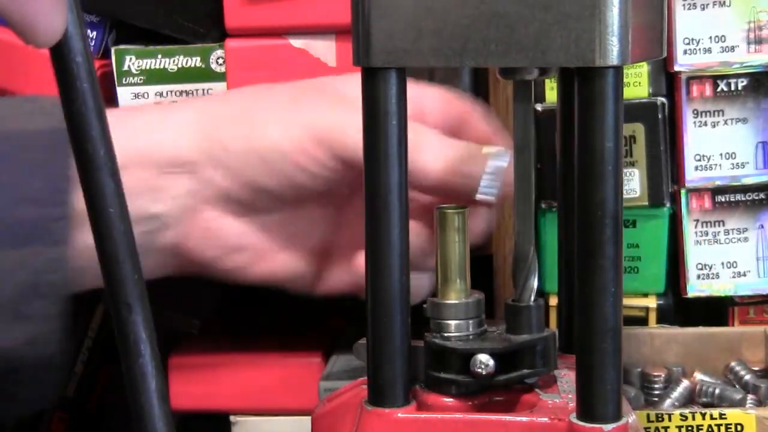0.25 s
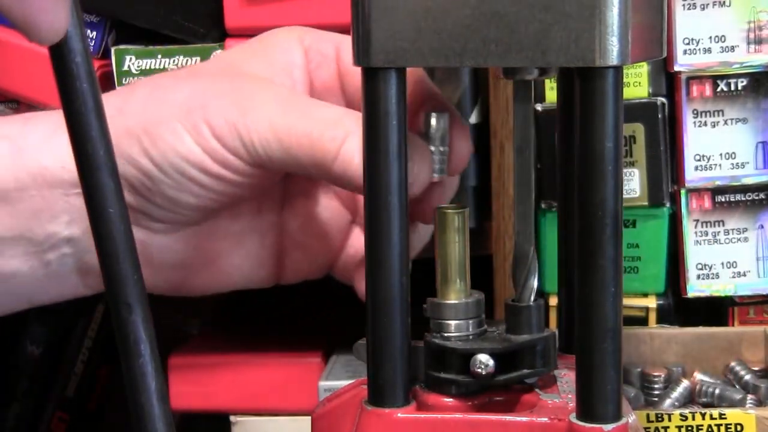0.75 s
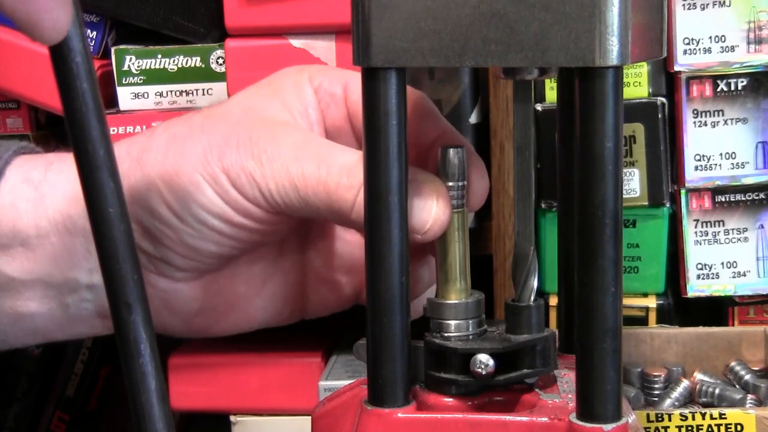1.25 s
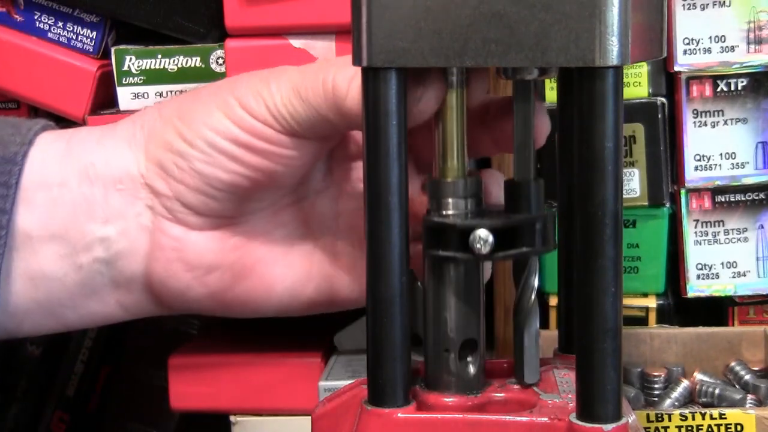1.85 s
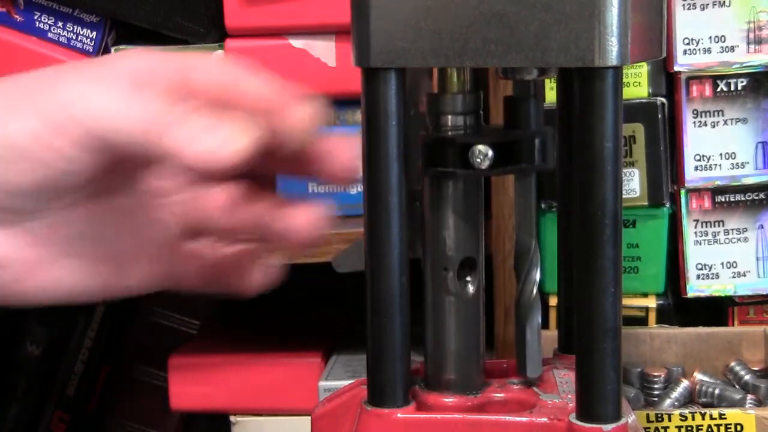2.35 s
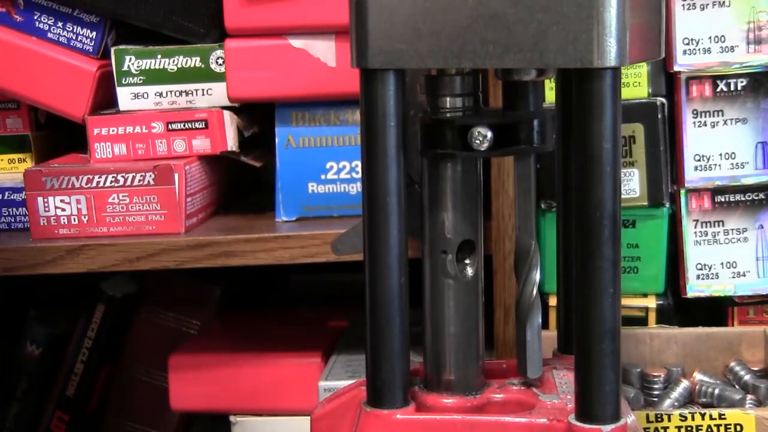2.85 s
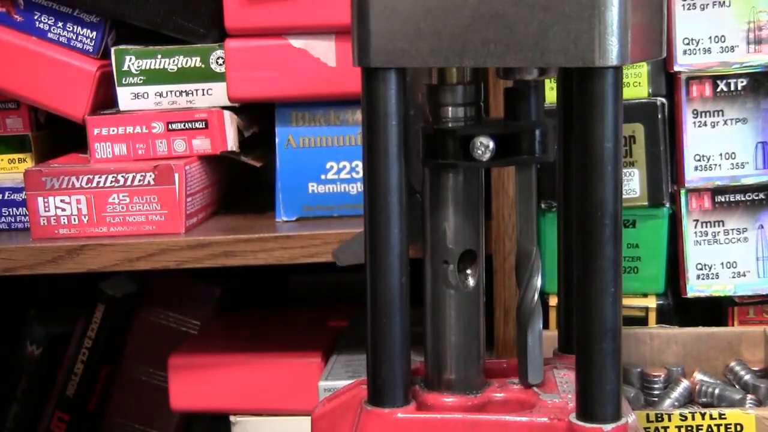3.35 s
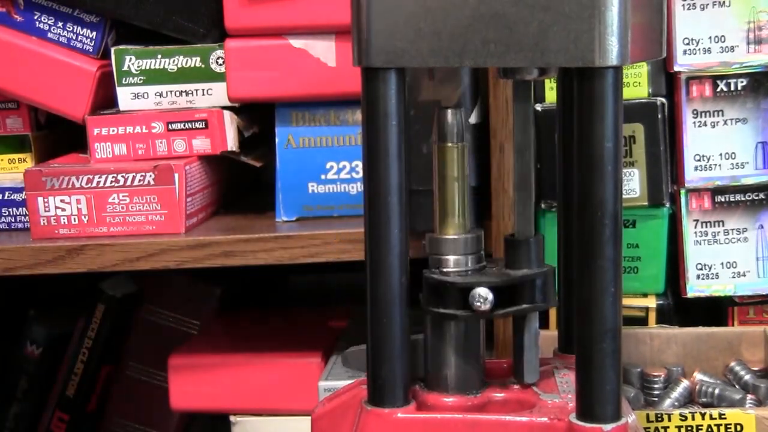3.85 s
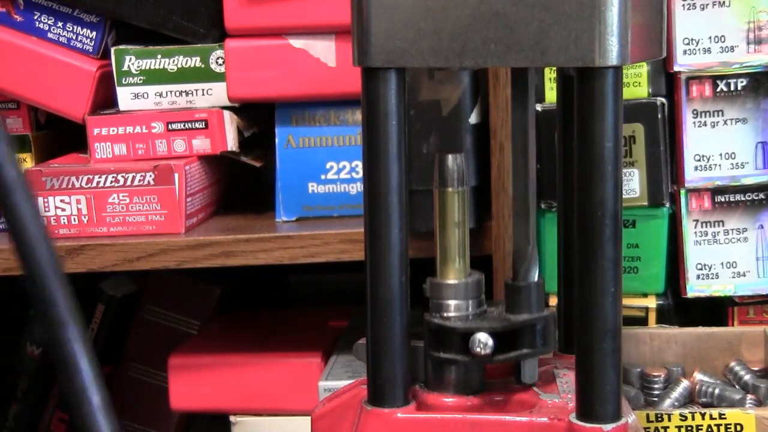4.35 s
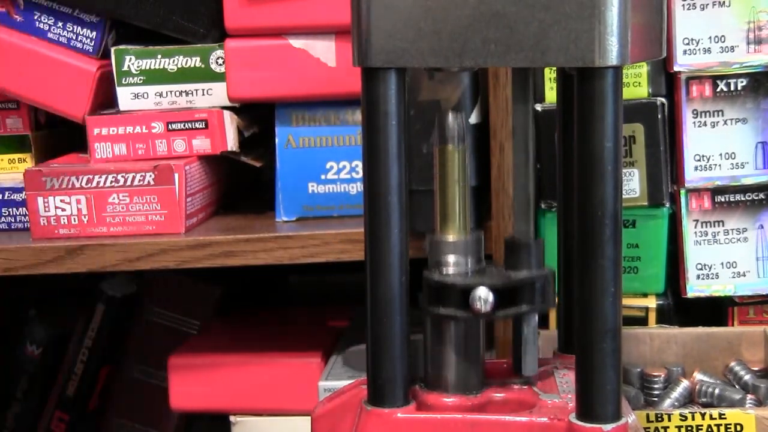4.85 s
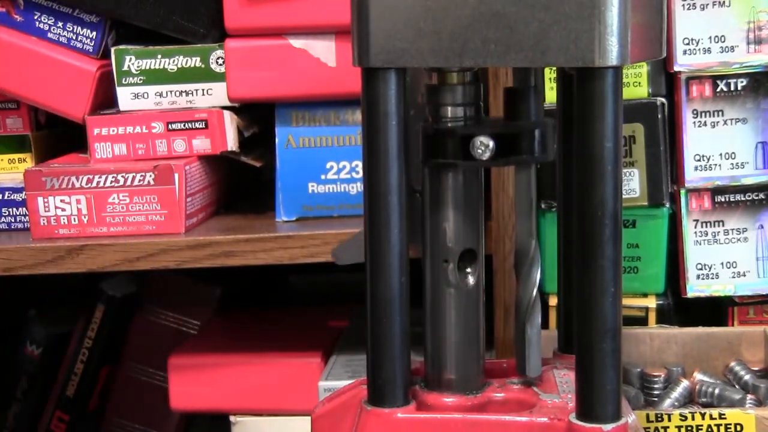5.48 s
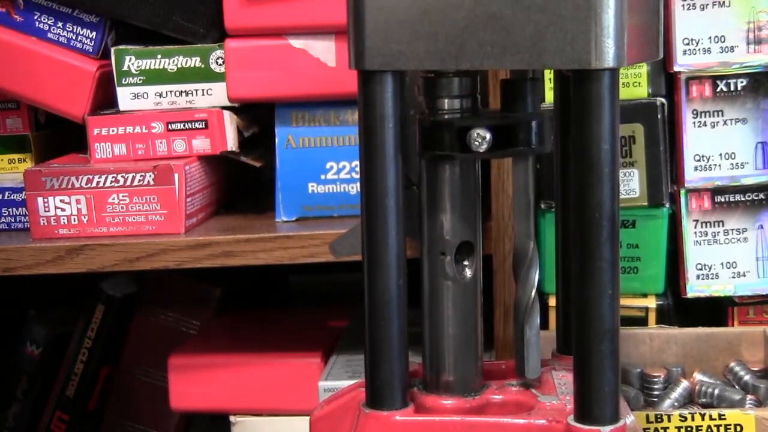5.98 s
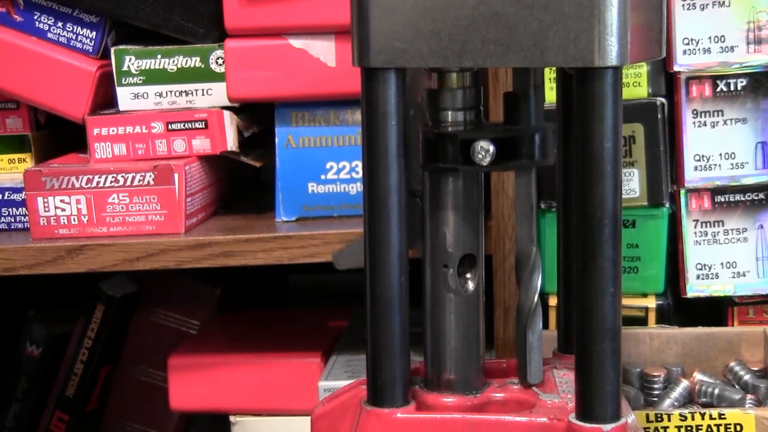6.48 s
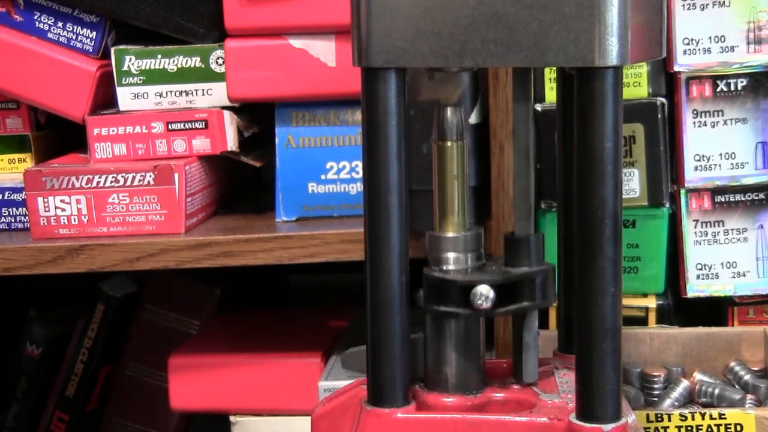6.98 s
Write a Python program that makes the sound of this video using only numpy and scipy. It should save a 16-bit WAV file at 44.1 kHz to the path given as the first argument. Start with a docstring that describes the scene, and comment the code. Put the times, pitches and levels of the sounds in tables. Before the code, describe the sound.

A hand-worked metal press on a wooden bench: quiet rubbing, then bursts of sharp clicks, clacks and short rattles over low thumps and faint hiss.

```python
"""A hand-worked turret press on a wooden bench in a small, furnished room.
From the start, bench rumble, hiss and the sliding ram's groan lie below; a hollow rub fades out by 0.7 s.
A lone knock at 0.9 s leads to a busy run from 1.6 s: noise-struck resonances, thin parts ringing on as beating
sine pairs, a loose part bouncing, then the ram's drag and damped low swings as the bench jolts the stand.
Sparser knocks follow, then hard clusters near 5 s, with more bounces, and near 6.8 s. Delays give the room."""
import sys
import numpy as np
from scipy import signal
from scipy.fft import rfft, irfft, next_fast_len
from scipy.io import wavfile
from scipy.ndimage import uniform_filter1d

SR = 44100
rng = np.random.default_rng(int(sys.argv[2]) if len(sys.argv) > 2 else 0)


def master_out(mix):
    """Clip the mix to full scale and print it as 16-bit PCM to the path in sys.argv[1]."""
    frames = np.transpose(np.atleast_2d(mix))
    ceiling = np.clip(frames, -1, 1)
    pcm = np.round(ceiling * 32767).astype(np.int16)
    wavfile.write(sys.argv[1], SR, pcm)


N = 318621

# Lever and ram in motion, before the bed trims: start_s, rumble_db, drag_db
MOTION = [(0, -63, -66), (.74, -58.5, -64.5), (1.3, -57.5, -70.5), (1.6, -55, -67), (1.83, -56, -62),
          (1.95, -49, -51), (2.09, -52, -47), (2.2, -46, -53.5), (2.28, -54, -49.5), (2.35, -59, -54),
          (2.41, -55, -63.5), (2.67, -58, -64.5), (2.88, -46.5, -58), (3.06, -60, -69), (3.5, -52, -66),
          (3.68, -59, -60), (3.86, -65, -63.5), (4.0, -51, -53.5), (4.1, -59, -65.5), (4.5, -55, -62.5),
          (4.93, -64, -68), (5.13, -65, -62), (5.23, -52, -65), (5.4, -50, -52), (5.52, -52, -64),
          (6.39, -62, -67), (7.06, -55, -63), (7.22, -52, -63)]
# Noise colours, relative before scaling to rms 1: pitch_hz, level_db_per_hz
RUMBLE_COLOUR = [(11, -44), (18, 14), (32, -0.5), (65, 9.5), (125, -10.5), (177, -33), (200, -20.5),
                 (260, -67), (440, -120)]
GROAN_COLOUR = [(65, -35), (110, 2.5), (269, -2.5), (345, -3.5), (384, -6.5), (433, -6), (600, -14.5),
                (780, -51), (1320, -120)]
SLIDE_COLOUR = [(450, -3), (650, -4), (800, -2), (1400, -5.5), (2000, -9), (3100, -15), (5000, -16.5),
                (9000, -19.5), (15000, -52)]
HISS_COLOUR = [(59, -38), (100, -2.5), (140, -46), (342, -21.5), (414, -22.5), (512, -16.5), (674, -19.5),
               (2030, -21), (2680, -20), (15900, -23.5)]
# How alike left and right hiss are: pitch_hz, likeness (0 to 1)
HISS_LIKENESS = [(60, 0.82), (130, 0.22), (290, 0.073), (640, 0.039), (1400, 0.022), (3000, 0.014)]
# The bench jolts the stand: start_s, swing_db (before damping), swing_hz
JOLTS = [(1.967, -40, 108), (2.169, -53, 37.7), (2.227, -23, 45), (2.287, -29.5, 79.5), (2.334, -31.5, 80),
         (2.812, -33.5, 102), (2.826, -29, 58), (2.888, -31, 37.8), (2.964, -34.5, 37), (3.27, -46, 70.0),
         (3.892, -40.5, 35.0), (3.941, -41, 26.9), (4.006, -36, 60.5), (5.172, -36, 69), (5.285, -35, 80),
         (5.313, -28.5, 56.5), (5.72, -46, 71.6), (6.014, -37, 70.4), (6.039, -32, 52), (6.456, -39, 72),
         (6.839, -32.5, 55), (7.13, -35, 72)]
# Loudness curve of a hollow rub close by: start_s, level_db
RUB_LEVEL = [(0.0, -53), (0.134, -55.5), (0.224, -57), (0.236, -60), (0.546, -60.5), (0.612, -62.5),
             (0.688, -89), (0.7, -75)]
# Resonances of the rubbed cavity, relative levels: pitch_hz, width_hz, level_db
HOLLOW_MODES = [(734, 43, 3), (710, 37, -9), (1460, 46, -33), (2110, 90, -10), (3100, 130, -20)]
# Metal contacts, part levels before trims: start_s, turret_db, frame_low_db, frame_high_db, edge_db,
# rattle_db (against the chatter), favoured_low_hz, favoured_middle_hz, favoured_high_hz
CONTACTS = [(0.9292, -24, -56, -48, -42.5, -19.5, 342, 1420, 4600),
            (1.1262, -55, -71, -59, -71, -13, 760, 1220, 7490),
            (1.5992, -43, -69, -57, -65, -9.5, 203, 1240, 11200),
            (1.6063, -37, -57, -54.5, -53, -16, 423, 1980, 11300),
            (1.6348, -35, -50.5, -44, -61, -18.5, 433, 1720, 5940),
            (1.6953, -49, -58, -56, -66, -14, 202, 869, 6640),
            (1.708, -39, -55, -47, -63, -14, 727, 1460, 5900),
            (1.727, -36, -48.5, -43, -56, -12.5, 750, 1100, 11200),
            (1.7616, -19, -44.5, -35, -56, -17.5, 240, 1470, 7340),
            (1.8837, -42, -60, -57, -68, -15, 361, 1670, 4530),
            (1.9065, -45.5, -56, -52, -64, -7, 248, 1680, 4600),
            (2.2353, -33.5, -49, -46, -50, -15, 202, 1150, 11300),
            (2.2424, -58, -40, -46.5, -64, -13.5, 275, 921, 2840),
            (2.2746, -68, -39, -41.5, -65, -15.5, 220, 1290, 2910),
            (2.364, -51, -45.5, -50.5, -71, -24, 220, 856, 4030),
            (2.4794, -61, -62, -56, -70, -19, 420, 939, 7260),
            (2.8005, -36.5, -45, -47, -57, -15, 250, 940, 4370),
            (2.8277, -67, -68, -62, -73, -23, 285, 886, 8860),
            (2.9139, -46.5, -69, -61.5, -68, -12, 234, 915, 3070),
            (3.1776, -48, -75, -59, -70, -15, 202, 1150, 2750),
            (3.2657, -44.5, -50, -42.5, -72, -15.5, 414, 1200, 2740),
            (3.291, -53, -67, -47.5, -72, -14, 237, 1450, 2830),
            (3.3347, -58, -50, -59, -70, -13.5, 333, 1100, 3840),
            (3.3576, -59, -56, -60, -71, -12, 240, 1160, 3930),
            (3.4233, -52, -59, -50.5, -69, -12.5, 407, 1840, 2930),
            (3.5882, -50, -70, -66, -60, -16, 296, 918, 6330),
            (3.668, -51, -62, -53.5, -72, -10, 358, 2330, 6510),
            (3.8058, -48.5, -66, -54, -69, -13, 275, 2200, 5850),
            (3.8616, -29.5, -56, -43.5, -60, -13, 433, 1540, 6240),
            (3.9384, -33, -61, -56, -46.5, -16.5, 428, 2570, 11500),
            (3.9631, -47, -37, -36.5, -66, -20.5, 380, 1080, 2870),
            (3.9736, -33.5, -38.5, -39, -66, -20.5, 340, 1060, 2980),
            (4.2841, -59, -55.5, -59, -66, -10, 236, 1050, 2870),
            (4.3174, -60, -54, -63, -72, -15, 433, 1670, 7080),
            (4.5397, -53, -51.5, -50.5, -72, -15, 334, 920, 6260),
            (4.5955, -39.5, -48, -42.5, -50.5, -13, 242, 830, 6500),
            (4.7365, -37, -63, -49.5, -48.5, -16, 441, 2220, 6950),
            (4.8534, -47, -73, -56, -58, -11, 258, 1930, 11100),
            (4.8663, -35.5, -57, -44.5, -50, -10.5, 340, 1530, 11300),
            (4.9321, -40, -61, -52, -67, -10.5, 455, 875, 10700),
            (4.9484, -36.5, -65, -51, -66, -11, 417, 1520, 6300),
            (5.0071, -15, -50, -31, -51, -19.5, 430, 1890, 7160),
            (5.0264, -44, -51, -52, -66, -14.5, 258, 2070, 6890),
            (5.0494, -38, -61, -54, -60, -12, 689, 937, 11300),
            (5.0588, -35.5, -63, -40, -54, -16, 345, 1150, 11400),
            (5.1496, -26, -50, -40, -52, -13, 420, 1430, 8810),
            (5.1584, -16.5, -48, -36, -51, -14, 455, 2050, 7300),
            (5.1664, -20.5, -35, -27, -52, -15.5, 440, 1270, 4550),
            (5.2854, -30, -42.5, -33, -55, -12, 242, 920, 2940),
            (5.3125, -46, -47, -40, -58, -19, 417, 1150, 4590),
            (5.3467, -18, -49, -31.5, -63, -20, 431, 1970, 7540),
            (5.5045, -47.5, -47, -50, -76, -18.5, 245, 900, 3400),
            (5.6264, -44.5, -67, -68, -77, -11.5, 420, 921, 3200),
            (5.7132, -63, -56, -48, -71, -17, 439, 1540, 2730),
            (5.7231, -68, -47.5, -45, -71, -14, 266, 1190, 3140),
            (5.7419, -64, -52, -48, -69, -24, 248, 1110, 2880),
            (6.0087, -43.5, -48.5, -46, -64, -15, 234, 896, 6530),
            (6.0643, -44.5, -39.5, -40, -60, -14.5, 507, 1150, 2800),
            (6.4372, -44, -51, -46, -68, -11, 253, 1590, 3060),
            (6.4587, -43, -49, -43.5, -74, -15.5, 431, 1150, 2770),
            (6.542, -53, -66, -48, -70, -18, 406, 1900, 6230),
            (6.7307, -40.5, -66, -52.5, -65, -18, 571, 1390, 7060),
            (6.7416, -41, -65, -52, -76, -14, 420, 2600, 2820),
            (6.7978, -35, -48, -39.5, -47, -13.5, 328, 2600, 9400),
            (6.8023, -18, -45, -34, -42, -15.5, 353, 1460, 4100),
            (6.8199, -28.5, -41, -37.5, -50, -16, 700, 945, 8930),
            (6.8396, -35, -54, -52, -58, -9, 229, 947, 11100),
            (6.9416, -41, -68, -56, -59, -17, 253, 2140, 5940),
            (7.007, -31, -61, -46.5, -53, -11, 229, 1660, 6340),
            (7.08, -40, -69, -63, -59, -13, 202, 1560, 11000),
            (7.0854, -37, -64, -57, -53, -9, 331, 1600, 11200),
            (7.1099, -27.5, -34, -35.5, -49, -19, 385, 1180, 9200),
            (7.1226, -46, -37.5, -36.5, -66, -18, 368, 1190, 2880),
            (7.1705, -45.5, -49, -46, -69, -16.5, 423, 960, 3050)]
# Damped resonances of the heavy parts, relative levels: pitch_hz, level_db, t60_s
TURRET_MODES = [(5720, -5, 0.0006), (5923, -3.5, 0.0033), (6218, -1, 0.0041), (6503, -3.5, 0.0032),
                (6573, -12.5, 0.012), (7560, -11, 0.0031), (7565, -7.5, 0.0032), (7460, -3.5, 0.0027),
                (7610, -12, 0.0038)]
FRAME_LOW_MODES = [(246, 3, 0.046), (345.8, 2, 0.13), (427.3, 3, 0.098), (512, -2, 0.06), (585, 0.5, 0.025),
                   (730, -1.5, 0.08)]
FRAME_HIGH_MODES = [(882, -2.5, 0.022), (1225, -2, 0.02), (1475, -2, 0.017), (1812, 1.5, 0.0095),
                    (1953, 3, 0.0081), (2335, -1.5, 0.0032)]
HOLDER_MODES = [(2760, -5.5, 0.0045), (3240, -5, 0.0063), (3750, -4, 0.0028), (4190, -4.5, 0.0028),
                (4542, -4, 0.014)]
EDGE_MODES = [(8540, -2, 0.0026), (9780, -1.5, 0.001), (11150, -2.5, 0.0022), (12700, -20, 0.00014),
              (13900, -9, 0.00038)]
# Blows on thin parts left ringing: start_s, then level_db of each mode before the ping trim
ROD_BLOWS = [(1.5984, -45, -49, -48), (1.6064, -36, -46, -45), (1.6347, -38, -41, -51),
             (1.7268, -27, -38, -38), (1.7594, -37, -46, -54), (3.8087, -57, -47, -63.5),
             (3.9393, -42, -54, -39), (4.8678, -27.5, -46, -35), (5.007, -35, -43, -50),
             (5.05, -39, -63, -46), (5.1694, -41, -41, -55), (5.3496, -42.5, -37, -53),
             (6.804, -48, -50, -50), (6.8345, -37.5, -41, -54), (6.941, -42, -40, -53),
             (7.086, -44, -53, -55)]
PIN_BLOWS = [(1.7065, -39, -50), (3.8641, -38.5, -40), (4.9337, -44, -56), (4.9496, -39, -52),
             (7.011, -35.5, -56)]
CASE_BLOWS = [(1.7614, -50, -35), (4.7386, -46, -59), (5.1652, -44, -22), (6.8037, -37, -37),
              (6.8234, -27, -52), (6.8384, -50, -50)]
# Modes of the thin parts: pitch_hz, free_t60_s (before seat damping)
ROD_MODES = [(11145, 0.2), (5870, 0.15), (11370, 0.04)]
PIN_MODES = [(10720, .1), (5960, .08)]
CASE_MODES = [(8900, 0.065), (4545, 0.05)]
# A loose part bounces to rest: start_s, first_gap_s, turret_db, loss_db (per bounce)
BOUNCES = [(1.7944, .0256, -23.5, 2.5), (5.196, .0281, -20.5, 2.5), (5.3849, 0.024, -25.5, 27)]

RUMBLE_TRIM_DB, HISS_DB, RUB_SCRAPE_DB = 0.5, -58, -6.5   # scrape is set against the rub's resonances
SLIDE_DB, SLIDE_FOLLOWS = -59.5, 1   # slide level at a drag of -55 dB, and its share of the drag's swing
ROOM_T60_S, WALL_CUT_HZ, ROOM_DB = 0.12, 4750, -8
HOLDER_SHARE, HOLDER_DB, EDGE_DB = 0.59, -2, 9   # the holder lies between turret and frame
CHATTER_T60_S, BOUNCE_RATTLE_DB = 0.013, -18.5
BOUNCE_HOLDER_DB = -3.5   # bounces reach the holder less
BOUNCE_LOW_DB, BOUNCE_HIGH_DB, BOUNCE_EDGE_DB = -20, -13, -38   # against the turret
BOUNCE_FAVOURED_HZ = (1700, 4600, 6860)
BOUNCE_ROD_DB, BOUNCE_CASE_DB = (-20, -27, -40), (-40, -10)   # each mode against the turret
REBOUND = 0.79   # each gap over the one before
SEAT_DAMPING = 0.55   # share of the free ringing time left to parts in their seats
CUTOFF_HZ = 16100


def from_db(db):
    """Decibels to gain."""
    return 10 ** (np.asarray(db) / 20)


def rms_one(x):
    """Scale to rms 1."""
    return x / np.sqrt(np.mean(x ** 2) + 1e-20)


def in_time(rows):
    """Draw each column of a curve as one value a sample."""
    start_s, *columns = np.transpose(rows)
    return [np.interp(np.arange(N) / SR, start_s, column) for column in columns]


def at_hz(points, hz):
    """Read a curve on a log-frequency axis."""
    pitch_hz, value = np.array(points).T
    return np.interp(np.log(hz), np.log(pitch_hz), value)


def ring(drive, hz, t60):
    """A two-pole resonator: a unit click starts a dying sine of height 1."""
    decay = from_db(-60 / (t60 * SR))
    turn = 2 * np.pi * hz / SR
    return signal.lfilter([0, np.sin(turn)], [1, -2 * decay * np.cos(turn), decay ** 2], drive + 1e-18)


def coloured(spectrum, likeness):
    """Stereo noise of the given colour and left-right likeness, at rms 1."""
    size = next_fast_len(N)
    hz = np.maximum(np.fft.rfftfreq(size, 1 / SR), 1)
    inside = (hz > spectrum[0][0]) & (hz < spectrum[-1][0])
    alike = np.clip(at_hz(likeness, hz), 0, 1)
    mid, side = rfft(rng.standard_normal((2, size)))
    both = np.sqrt(1 + alike) * mid + np.sqrt(1 - alike) * side * [[1], [-1]]
    shaped = both * from_db(at_hz(spectrum, hz)) * inside
    return rms_one(irfft(shaped, size)[:, :N])


def add(track, s, piece):
    """Mix a piece into a track at time s."""
    i = round(s * SR)
    track[i:i + len(piece)] += piece[:len(track) - i]


def bench_rumble(rumble_db):
    """Low noise swells in the bench as lever and ram move."""
    return from_db(rumble_db) * coloured(RUMBLE_COLOUR, [(25, 0.93), (60, 1.0), (200, 0.91)])


def slide(drag_db, groan_grain_db=2.5, slide_grain_db=2.0):
    """The greased ram drags unevenly in its bore and the frame groans with it."""
    uneven = rms_one(signal.lfilter([1], [1, -0.9985], rng.standard_normal(N)))
    groan = coloured(GROAN_COLOUR, [(200, 0.78), (500, 0.64)])
    groan_db = drag_db + groan_grain_db * uneven
    grease = coloured(SLIDE_COLOUR, [(500, 1.0), (3000, 1.0)])
    slide_db = SLIDE_DB + SLIDE_FOLLOWS * (drag_db + 55) + slide_grain_db * uneven
    return from_db(groan_db) * groan + from_db(slide_db) * grease


def microphone_hiss():
    """Steady noise, less alike between the sides as pitch rises."""
    return from_db(HISS_DB) * coloured(HISS_COLOUR, HISS_LIKENESS)


def rub(steadiness=0.45, smooth_s=0.061):
    """Friction noise excites a narrow cavity; an even stroke keeps the loudness from flickering."""
    noise = rng.standard_normal(N)
    cavity = np.zeros(N)
    for hz, width_hz, db in HOLLOW_MODES:
        t60 = np.log(1000) / (np.pi * width_hz)
        cavity += from_db(db) * rms_one(ring(noise, hz, t60))
    power = uniform_filter1d(cavity ** 2, round(smooth_s * SR))
    cavity = rms_one(cavity / power ** (steadiness / 2))
    scrape = from_db(RUB_SCRAPE_DB) * coloured(SLIDE_COLOUR, [(500, 1), (3000, 1)])[0]
    level_db, = in_time(RUB_LEVEL)
    rubbing = np.arange(N) < RUB_LEVEL[-1][0] * SR
    return from_db(level_db) * (cavity + scrape) * rubbing


def room(near):
    """Six feedback delays a side stand for wall reflections, duller on every round."""
    size = next_fast_len(N + SR)
    one_sample = np.exp(-2j * np.pi * np.fft.rfftfreq(size))
    dull = np.exp(-2 * np.pi * WALL_CUT_HZ / SR)
    wall = (1 - dull) / (1 - dull * one_sample)
    sides = np.zeros((2, len(one_sample)), complex)
    lags = (rng.uniform(0.006, 0.022, 12) * SR).astype(int)
    for k, lag in enumerate(lags):
        loop = from_db(-60 * lag / SR / ROOM_T60_S) * wall * one_sample ** lag
        sides[k % 2] += loop / (1 - loop) * (-1) ** (k // 2)
    shared = sides.mean(axis=0)
    narrow = shared + 0.043 * (sides - shared)   # the two microphone ports sit close together
    return irfft(rfft(near, size) * narrow, size)[:, :N]


def press(hops, spread_db=1.0, focus_db=8, focus_octaves=0.29, rise_s=0.0006, rise_cycles=0.41,
          rattle_t60=0.15, first_db=15):
    """Each contact is a dying chatter of micro-blows, then a fainter rattle of loose play, ringing every part."""
    hop_rows = [(s, db, db + BOUNCE_LOW_DB, db + BOUNCE_HIGH_DB, db + BOUNCE_EDGE_DB,
                 BOUNCE_RATTLE_DB, *BOUNCE_FAVOURED_HZ) for s, db in hops]
    rows = np.array(CONTACTS + hop_rows)
    turret, low, high, edge = rows[:, 1:5].T
    hop_trim_db = np.r_[np.zeros(len(CONTACTS)), np.full(len(hops), BOUNCE_HOLDER_DB)]
    holder = HOLDER_DB + hop_trim_db + HOLDER_SHARE * turret + (1 - HOLDER_SHARE) * high
    parts = [(TURRET_MODES, turret), (FRAME_LOW_MODES, low), (FRAME_HIGH_MODES, high),
             (HOLDER_MODES, holder), (EDGE_MODES, edge + EDGE_DB)]
    t = np.arange(SR // 8) / SR
    rattle = from_db(rows[:, 5:6] - 60 * t / rattle_t60)
    dying = from_db(-60 * t / CHATTER_T60_S) + rattle
    out = np.zeros(N)
    for modes, part_db in parts:
        # heavy parts are slower to start
        shape = (1 - np.exp(-t / (rise_s + rise_cycles / modes[0][0]))) * dying
        blows = shape * rng.standard_normal(shape.shape)
        # a clean first blow, clearer in hard contacts
        blows[:, np.argmax(shape[0])] += from_db(first_db + 0.35 * turret)
        chatter = np.diff(blows, prepend=0)   # thins the sound far below each mode
        luck_db = spread_db * rng.standard_normal((len(rows), len(modes)))
        for k, (hz, mode_db, t60) in enumerate(modes):
            rung = ring(chatter, hz, t60) * (-1) ** k
            # the mode takes the blow's energy
            energy_ratio = np.sum(shape ** 2, axis=1) / np.sum(rung ** 2, axis=1)
            rung *= np.sqrt(energy_ratio)[:, None]
            # the point of contact favours modes near three pitches
            octaves = np.log2(hz / rows[:, 6:])
            favour_db = focus_db * np.exp(-(octaves / focus_octaves) ** 2).max(axis=1)
            levels_db = part_db + luck_db[:, k] + favour_db + mode_db
            for s, piece, db in zip(rows[:, 0], rung, levels_db):
                add(out, s, piece * from_db(db))
    return out


def pings(blows, modes, trim_db=-4, rise_s=0.00036, split=0.0046, twin_db=-7):
    """Each mode of a thin round part is a close pair that beats as it dies."""
    t = np.arange(SR // 4) / SR
    out = np.zeros(N)
    luck = rng.uniform(-1, 1, (len(blows), len(modes), 2))
    for (s, *levels_db), draws in zip(blows, luck):
        for (hz, free_t60), db, (start, apart) in zip(modes, levels_db, draws):
            twin_hz = hz * (1 + split * (1 + apart / 2))
            twin = from_db(twin_db) * np.sin(2 * np.pi * twin_hz * t + np.pi * start)
            pair = np.sin(2 * np.pi * hz * t) + twin
            fade = from_db(db + trim_db - 60 * t / (free_t60 * SEAT_DAMPING))
            add(out, s, pair * (1 - np.exp(-t / rise_s)) * fade)
    return out


def bounces(count=4):
    """A loose part loses energy at each landing: gaps shrink, blows weaken (start_s, turret_db)."""
    hops = []
    for s, gap, db, loss in BOUNCES:
        for j in range(count):
            elapsed = gap * (1 - REBOUND ** j) / (1 - REBOUND)
            hops.append((s + elapsed, db - loss * j))
    return hops


def bounce_pings(hops, shares_db):
    """Each bounce also sets the modes of a thin part ringing."""
    return [(s, *(db + np.array(shares_db))) for s, db in hops]


def stand_jolts(turns=2.1):
    """Jolts from the bench swing the stand, losing 20 dB every few turns."""
    out = np.zeros(N)
    for s, db, hz in JOLTS:
        phase = np.arange(SR // 5) / SR * hz
        add(out, s, from_db(db - 20 * phase / turns) * np.sin(2 * np.pi * phase))
    return out


def scene():
    """Layer the beds and jolts under the close sounds and their room."""
    rumble_db, drag_db = in_time(MOTION)
    beds = bench_rumble(rumble_db + RUMBLE_TRIM_DB) + slide(drag_db) + microphone_hiss()
    hops = bounces()
    rod = pings(ROD_BLOWS + bounce_pings(hops, BOUNCE_ROD_DB), ROD_MODES)
    pin = pings(PIN_BLOWS, PIN_MODES)
    case = pings(CASE_BLOWS + bounce_pings(hops, BOUNCE_CASE_DB), CASE_MODES)
    near = rub() + press(hops) + rod + pin + case
    return near + from_db(ROOM_DB) * room(near) + beds + stand_jolts()


def record(dry):
    """A steep low-pass cuts the top, 80 dB down from the cutoff up."""
    return signal.sosfilt(signal.cheby2(16, 80, CUTOFF_HZ, fs=SR, output="sos"), dry)


dry = scene()
out = record(dry)
master_out(out)
```